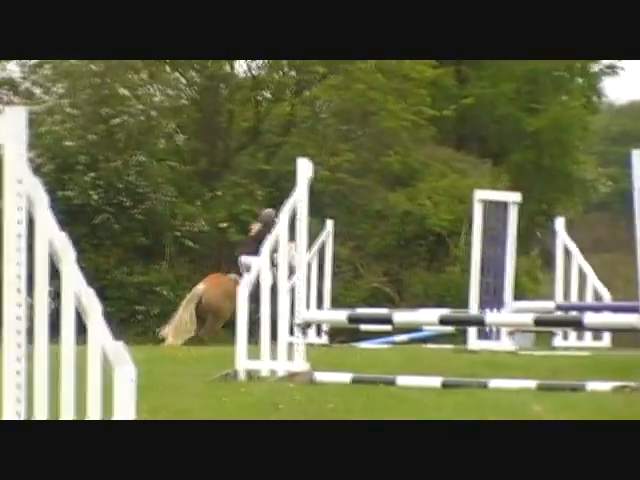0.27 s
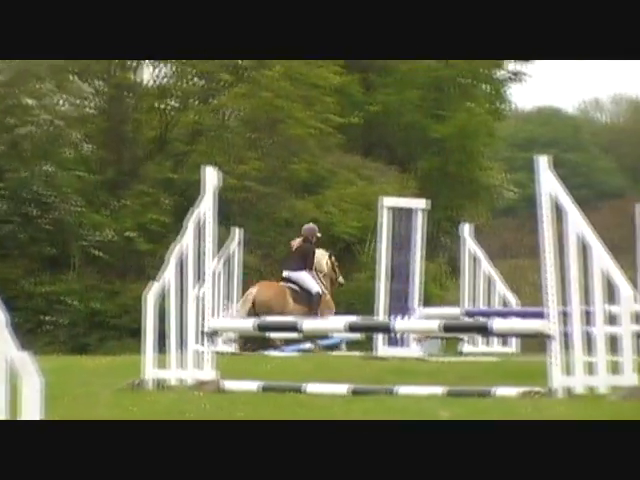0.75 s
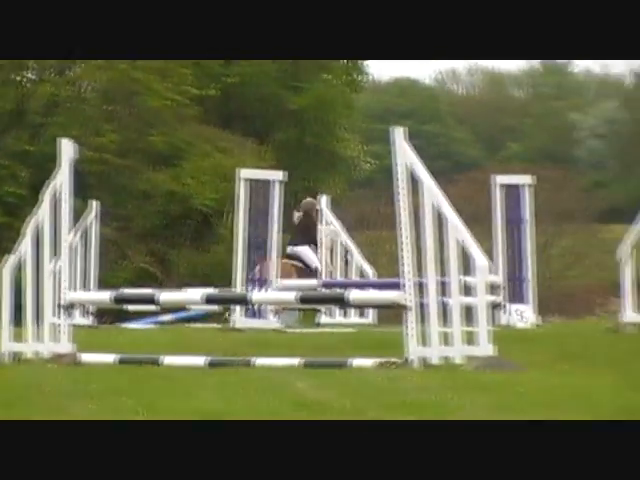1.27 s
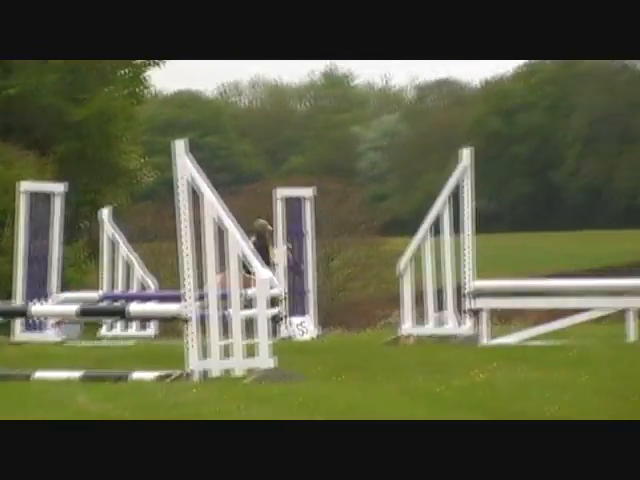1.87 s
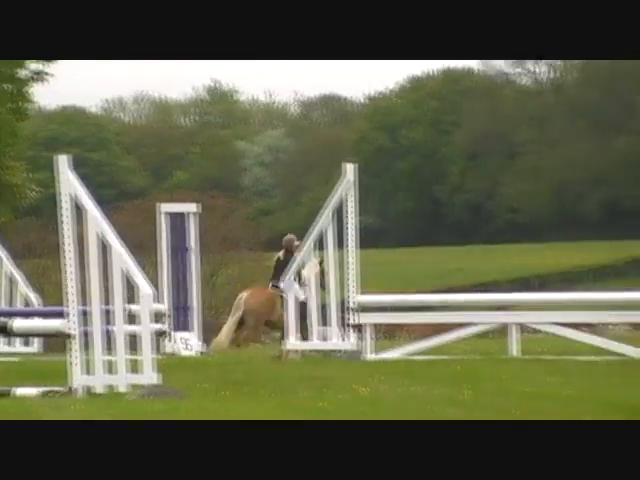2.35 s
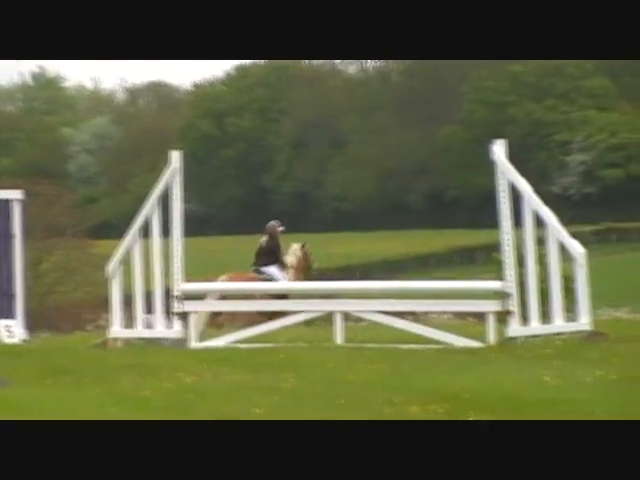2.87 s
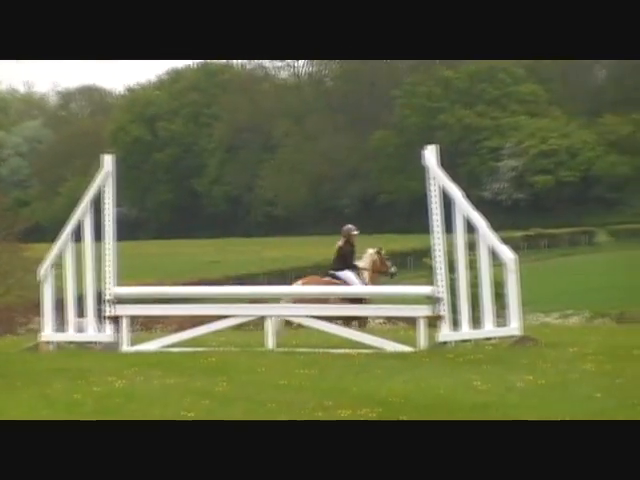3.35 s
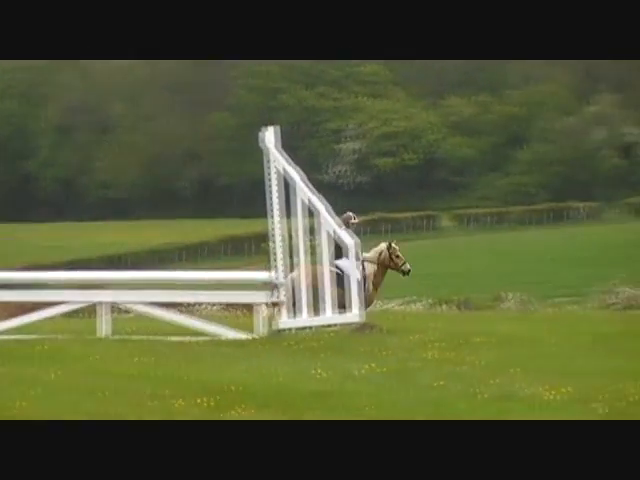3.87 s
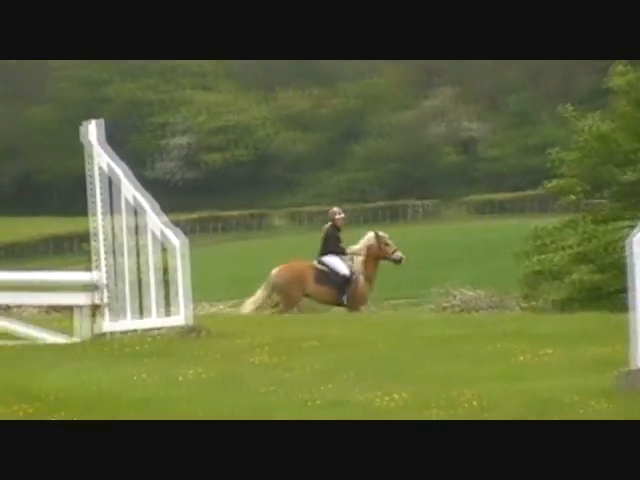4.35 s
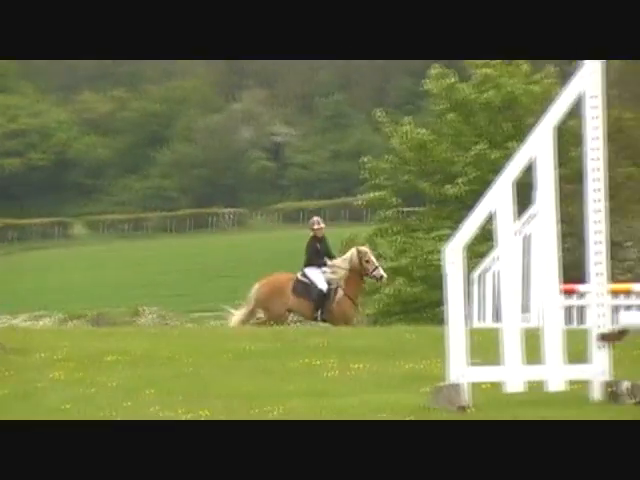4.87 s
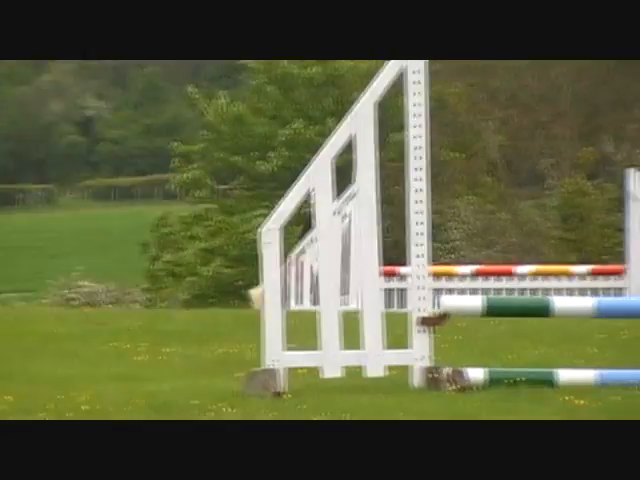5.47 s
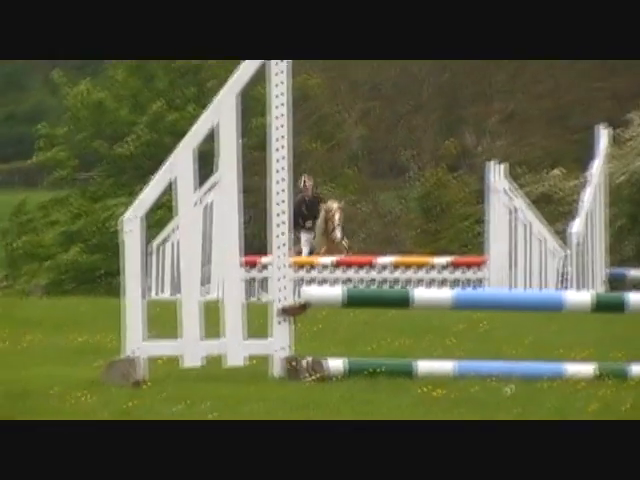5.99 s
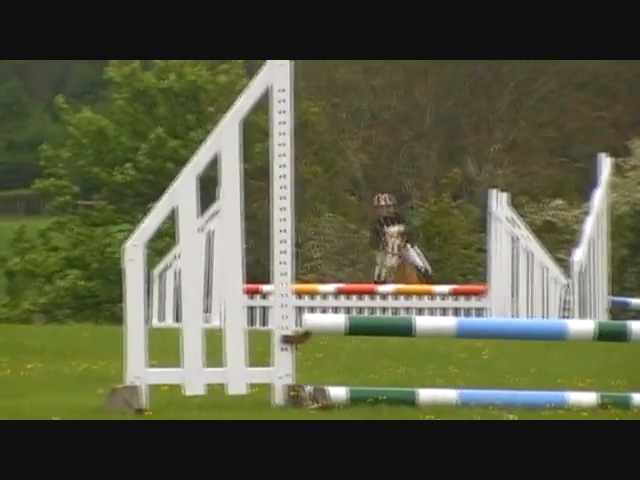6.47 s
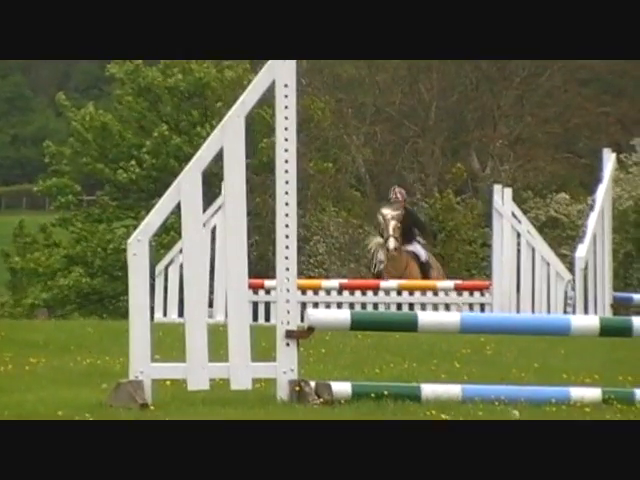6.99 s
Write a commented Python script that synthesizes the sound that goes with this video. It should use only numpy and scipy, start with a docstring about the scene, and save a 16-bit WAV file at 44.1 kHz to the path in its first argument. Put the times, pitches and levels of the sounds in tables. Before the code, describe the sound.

A windy open field, heard through an exposed stereo microphone. Deep, uneven gusts buffet the two sides throughout; from about 0.6 to 2.5 seconds they also rush and roar, with a lull near 3.5-4, then mostly low rumbling with occasional slaps near 5.2 and 5.9. Close by, small metal rings clink from the very start, notably at 0.2, 2.5 and 5.0, with little scrapes and short slides early on. Crisp grass crunches and stalk snaps recur roughly every 0.6 seconds from 0.35, sharp at 3.4 and 4.7, fainter after 6. Thin bird whistles glide at 0.2, 1.3-2.1, 3.0, 5.2 and repeatedly after 6. Faint dull hoof thuds come at 2.2 and 3.4-3.8, then 4.9, strongest at 5.5-5.6, continuing in quick succession from 5.9 to 6.4. A short hollow knock sounds far away at 3.9. Soft leaf wash lies beneath until the end at 7.2.

```python
"""Turbulent wind buffets two microphone ports, largely in opposite phase, over a wash of leaves and distance.
From the start small metal rings jingle like a bit: inharmonic decaying modes, with scrapes and slides.
Soon noise bursts crunch as grass in a slow beat, as of grazing, and gliding sines whistle as small birds.
After two seconds a pony canters far off on the turf: dull thuds from a struck, damped ground.
Near four seconds two short damped sines give a hollow knock across the field."""
import sys
import numpy as np
from scipy import signal
from scipy.fft import rfft, irfft
from scipy.io import wavfile
from scipy.ndimage import uniform_filter1d, minimum_filter1d

SR = 44100
rng = np.random.default_rng(int(sys.argv[2]) if len(sys.argv) > 2 else 0)


def pcm_store(signal):
    """Save signal as 16-bit PCM."""
    levels = np.round(np.clip(np.atleast_2d(signal), -1, 1) * 32767)
    wavfile.write(sys.argv[1], SR, levels.astype(np.int16).T)


N = 318402
T, FREQS = np.arange(N) / SR, np.maximum(np.fft.rfftfreq(N, 1 / SR), 1)

# gusts on the ports: start t/s, end t/s, buffeting level/dB, rush of the breaking flow level/dB,
# sag of the rush/(dB/s)
GUSTS = [(0.043, 0.09, -10.5, -34, 8), (0.1, 0.149, -12.5, -31.5, 20), (0.402, 0.44, -12, -28.5, 0),
         (0.456, 0.53, -10, -25.5, -3), (0.601, 0.65, -11.5, -24.5, 60), (0.711, 0.93, -12, -25, 29),
         (0.977, 1.11, -15, -29, 25), (1.136, 1.242, -9.5, -21, -8), (1.274, 1.42, -10.5, -21, 22),
         (1.46, 1.555, -11.5, -21.5, -45), (1.582, 1.642, -8.5, -22.5, 38), (1.735, 1.765, -12, -16.5, -12),
         (1.806, 1.911, -9.5, -20.5, 16), (1.926, 2.026, -10, -29, -30), (2.052, 2.058, -13, -20, 0),
         (2.241, 2.323, -13, -28, 102), (2.416, 2.505, -10, -23.5, 50), (2.535, 2.895, -8.5, -31, 0),
         (2.943, 2.966, -11.5, -31.5, 20), (3.048, 3.133, -9, -34, 1), (3.203, 3.24, -8.5, -46.5, 0),
         (3.297, 3.284, -8.5, -24.5, 0), (3.449, 3.454, -18.5, -38, 30), (3.707, 3.712, -21.5, -81, 0),
         (4.042, 4.18, -18, -44, -26), (4.202, 4.3, -11.5, -34.5, 23), (4.36, 4.373, -12.5, -54, 0),
         (4.642, 4.706, -10.5, -34, -17), (4.73, 4.766, -7.5, -33, 0), (4.89, 4.91, -10, -40, 0),
         (4.937, 5.006, -9.5, -34, -25), (5.091, 5.405, -9, -32, 5), (5.519, 5.795, -9.5, -31, 23),
         (5.85, 5.98, -9.5, -40.5, -36), (6.026, 6.134, -11, -47.5, 3), (6.163, 6.414, -11, -42.5, -4),
         (6.554, 6.72, -6, -51, 0), (6.779, 6.997, -8, -32.5, 59), (7.073, 7.223, -8.5, -40.5, -13)]
GUST_ATTACK_S, GUST_RELEASE_S = 0.039, 0.041
BUFFET_SAG_DB_PER_S = 6
# light breeze between gusts: t/s, buffeting level/dB
BREEZE = [(0, -11.5), (0.33, -23), (0.65, -25), (1.7, -15), (2.15, -19.5), (2.35, -22), (2.52, -16),
          (3.1, -14), (3.45, -22), (3.6, -28), (3.95, -27.5), (4.1, -15.5), (4.5, -18), (5.8, -13.5),
          (6.5, -14), (7.22, -16)]
BREEZE_RUSH_DB, RUSH_PER_BUFFET = -10, 2.51   # rush at 0 dB of buffeting; dB of rush per dB of buffeting
# spectrum of the eddies before gusts act: f/Hz, relative level/(dB per Hz)
WIND_COLOUR = [(20, -61), (40, -34.5), (85, -25.5), (150, -24.5), (210, -25.5), (300, -24.5), (500, -30.5),
               (1000, -37.5), (1400, -42), (2000, -50.5), (2600, -56.5), (3300, -68.5), (4500, -79.5)]
# how far each pitch follows the rush rather than the buffeting: f/Hz, weight/1
RUSH_SHARE = [(170, 0.021), (300, 0.41), (500, 0.52), (1000, 0.74), (2500, 1.63)]
# part of the wind that both ports share: f/Hz, middle relative to side level/dB
WIND_COMMON = [(30, -13), (85, -15.5), (170, -13), (300, -11), (700, -12), (2000, -5.5)]

FIELD_DB = -68.5   # gain of distant trees and field outside the dips
# brief dips of the background: middle t/s, depth level/dB, half length t/s
DIPS = [(1.65, 2, 0.37), (2.1, 6, 0.091), (2.72, 5, 0.061), (5.286, 3, 0.041), (5.85, 3, 0.54),
        (6.17, 11.5, 0.2), (6.926, 7, 0.16)]
# colour of the field before its gain: f/Hz, relative level/(dB per Hz)
FIELD = [(60, 1.5), (300, -16.5), (600, -12.5), (1000, -12), (1250, -16.5), (1600, -18), (2400, -25.5),
         (3500, -31), (5000, -34), (8500, -38), (11000, -48.5), (15000, -55)]
# width of the field: f/Hz, side to middle level/dB
FIELD_SIDE = [(100, 14), (600, -8), (2500, -4.5), (5000, -4.5), (8000, 0), (12000, 3)]

# crunches of grass in a slow beat: middle t/s, relative level/dB, half length t/s
CRUNCHES = [(0.367, -57, 0.033), (1.012, -58, 0.033), (1.619, -55.5, 0.029), (2.249, -59, 0.045),
            (2.833, -58, 0.029), (3.427, -52, 0.023), (4.06, -60.5, 0.029), (4.68, -52.5, 0.031),
            (5.498, -56.5, 0.018), (6.108, -70, 0.038), (6.698, -64, 0.039)]
# thick stalks snapping: t/s, relative level/dB, centre f/Hz
SNAPS = [(0.3475, -34, 6000), (0.3634, -34, 6000), (0.3697, -32, 5000), (0.3757, -37, 6000),
         (0.424, -34.5, 7000), (0.456, -34, 7000), (0.487, -36.5, 10000), (0.9587, -30.5, 7000),
         (0.972, -34, 8000), (0.989, -32, 7000), (1.105, -38, 5500), (1.1097, -29.5, 5500),
         (1.172, -40, 8000), (1.29, -41, 10000), (1.5997, -33, 3500), (1.603, -40, 4000), (1.62, -44, 3000),
         (1.657, -41, 7000), (1.68, -34, 9000), (1.702, -38, 6000), (2.198, -30.5, 2960),
         (2.214, -31, 3500), (2.235, -34, 7000), (2.2824, -28, 3900), (2.296, -33, 4500),
         (2.334, -34.5, 9000), (2.824, -34, 3500), (2.9034, -40, 9000), (3.2374, -30, 1500),
         (3.2424, -26, 11000), (3.266, -29, 2100), (3.388, -33, 5000), (3.4234, -22.5, 4000),
         (3.431, -29, 5000), (3.437, -35, 6000), (3.477, -31, 6040), (3.494, -29.5, 9000),
         (3.506, -32, 9000), (4.025, -37, 3800), (4.08, -34, 6000), (4.607, -37, 6000),
         (4.6538, -24.5, 6030), (4.6835, -39, 5000), (4.6946, -41, 6000), (4.735, -29.5, 3480),
         (5.108, -38, 7000), (5.186, -36, 7000), (5.455, -26.5, 6100), (5.4891, -30, 5000),
         (5.521, -36, 7000), (5.5554, -38, 9000), (5.985, -42, 4200), (6.112, -42, 8500),
         (6.7134, -38, 4000), (6.8403, -41.5, 3500)]
# colour of the tearing grass: f/Hz, relative level/(dB per Hz)
GRASS = [(400, 15.5), (1200, 11.5), (2500, 8), (4700, 2.5), (6500, -0.5), (9000, -1.5), (12000, -14.5),
         (14000, -23), (15500, -38)]
# width of the grass: f/Hz, side to middle level/dB
GRASS_SIDE = [(400, -11), (3000, -13.5), (5500, -9), (8000, -2.5), (10000, 6.5), (15000, 7)]
FIBRE_S, SNAP_S = 0.0002, 0.0004   # decay times of a fibre's crack and a stalk's snap

# clinks of the rings: t/s, relative level/dB, upper partials relative level/dB,
# larger ring relative level/dB, base ring time t/s, scrape relative level/dB
JINGLES = [(0.0024, -31.5, -11, -28, 0.077, -45), (0.174, -50, -3, -4, 0.13, -45),
           (0.208, -28, -11, -24, .06, -47), (0.22, -41.5, -10, -11, 0.12, -44),
           (0.2833, -44.5, -6, -14, 0.069, -49), (0.676, -37.5, -21, -18, 0.048, -50),
           (0.798, -39.5, -12, -5, 0.11, -52), (0.834, -42, -22, -7, 0.055, -56),
           (1.337, -39, -21, -20, 0.054, -55), (1.444, -47, 0.5, -22, 0.051, -60),
           (1.701, -56, 2, -12, 0.039, -55), (1.895, -47, -9, -14, 0.058, -56),
           (1.915, -41, -16, -19.5, 0.038, -53), (2.025, -45.5, -9, -12, 0.1, -49),
           (2.3335, -61, 6, -6, 0.34, -48), (2.368, -36.5, -11, -22, 0.048, -49),
           (2.489, -31, -15, 2.5, 0.11, -37), (2.641, -42, -10.5, -11, 0.09, -54),
           (3.062, -42, -5, -25, 0.037, -43), (3.1374, -46.5, -2.5, -12, 0.073, -46),
           (3.243, -49, -11, -13, 0.056, -46), (3.272, -45, -2, -12, 0.055, -53),
           (3.304, -51, -1, -11.5, 0.057, -47), (3.7214, -42, -6.5, -7, 0.084, -52),
           (4.271, -50.5, -16, 11, .12, -51), (4.44, -36, -5.5, -29.5, 0.024, -57),
           (4.692, -44, -10, -10, .06, -55), (4.7606, -46, -12, -20, 0.041, -55),
           (4.9712, -33, -11.5, -29, 0.031, -45), (5.056, -51, -16, -14, .04, -55),
           (5.157, -42, -6, -23, 0.029, -52), (5.361, -38, -9, -25, 0.051, -53),
           (5.568, -49, -10, -13, 0.043, -58), (5.8215, -45, -7, -18, 0.035, -53),
           (5.928, -45, -11, -19, 0.06, -62), (6.1245, -51, -8, -14, .06, -55),
           (6.349, -49, -10, -14, 0.049, -58), (6.434, -55, -3, -12, 0.066, -59),
           (6.5, -52, -14, -10, 0.13, -67), (6.5242, -41.5, -2.5, -18, 0.077, -49),
           (6.574, -55, -12, -8, 0.056, -60), (6.6317, -48, 8, -16, 0.066, -52),
           (6.894, -59.5, -4, -5, .12, -71), (7.1172, -45, -5, -10, 0.052, -54)]
# modes of the smaller ring: f/Hz, relative level/dB, share of the ring time/1, phase lead at left/rad
SMALL_RING = [(5740, -2, 0.47, .7), (5705, 0.5, 0.69, .7), (11020, 5, 1.2, 2.4), (11500, -6, 0.83, 1.4),
              (15684, -15, 1.1, 2.3)]
# modes of the larger ring: f/Hz, relative level/dB, share of the ring time/1, phase lead at left/rad
LARGE_RING = [(5467, -2, 2, 0.64), (11080, 11.5, 0.8, 2.3), (11360, 3, 0.75, 1.9), (15110, -6, 1.3, 2.6)]
GRIP_T60_S = 0.012   # ring time of a mode under an ordinary contact

# single eddies that slap the ports: t/s, relative level/dB, crack relative to the swing level/dB
SLAPS = [(0.127, -8, -26), (0.595, -7, -18), (1.735, -6, -19), (1.758, -4, -14), (1.959, -7, -22),
         (2.02, -6, -26), (2.665, -3, -13), (5.167, -9, -22), (5.866, -4, -9), (5.966, -7, -27),
         (5.99, -6, -11)]
# rings sliding over each other: middle t/s, level/dB, half length t/s, pitch f/Hz
SLIDES = [(0.163, -59.5, 0.033, 5480), (0.654, -55, 0.013, 5750), (0.824, -53, .007, 5460),
          (1.028, -54, .005, 5700), (1.218, -60, 0.012, 5500), (1.329, -61, 0.0073, 5650)]
# bird whistles: t/s, length t/s, starting f/Hz, final f/Hz, glide t/s, relative level/dB
BIRDS = [(0.202, 0.063, 3680, 3150, .04, -67), (1.3, 0.355, 2890, 4330, 0.028, -67),
         (1.87, 0.27, 4040, 3890, .15, -71), (2.03, 0.12, 4220, 4100, 0.14, -77),
         (3.045, 0.061, 3930, 3770, 0.015, -66.5), (5.982, 0.027, 4620, 4200, 0.0069, -64),
         (5.163, 0.08, 3290, 2650, 0.038, -67), (6.155, 0.066, 4250, 6200, 0.092, -80),
         (6.224, 0.021, 4300, 3980, .01, -71), (6.331, 0.022, 3880, 4300, 0.011, -66),
         (6.455, 0.022, 3080, 3400, .01, -67), (6.85, 0.1, 4100, 3330, 0.048, -76),
         (6.97, 0.024, 4940, 4050, 0.014, -68), (7.12, 0.075, 3830, 3400, 0.036, -71)]
# hooves on turf: t/s, relative thud level/dB, peak scuff level/dB
HOOVES = [(2.175, -26, -32.5), (3.352, -28.5, -51), (3.43, -35, -47), (3.779, -29.5, -31.5),
          (4.89, -16.5, -40), (5.51, -8, -44), (5.587, -12.5, -28), (5.925, -12.5, -30),
          (6.05, -16.5, -36.5), (6.123, -16, -48), (6.198, -18, -40), (6.279, -22, -48),
          (6.386, -18.5, -35)]
# modes of the turf: f/Hz, relative level/dB, 60 dB decay t/s
TURF = [(133, -10, 0.036), (204, 30.5, 0.05), (290, 7, 0.11), (435, -23, 0.028), (700, -31, .025)]
# far hollow knock: t/s, f/Hz, relative level/dB, 60 dB decay t/s
KNOCK = [(3.942, 1540, -33, .028), (3.941, 1740, -38, .016)]
CUTOFF_HZ = 15900


def from_db(db):
    """The definition of the decibel turns a level into an amplitude gain."""
    return np.exp(np.asarray(db) * np.log(10) / 20)


def rms_one(x):
    """Normalisation by mean power gives rms 1."""
    return x / np.sqrt(np.mean(x ** 2) + 1e-20)


def at_hz(points, hz):
    """Linear interpolation on a log-frequency axis reads a spectrum."""
    f, value = np.transpose(points)
    return np.interp(np.log(hz), np.log(f), value)


def colour(x, spectrum):
    """Multiplication in the frequency domain filters by a smooth spectrum."""
    return irfft(rfft(x) * from_db(at_hz(spectrum, FREQS)), N)


def drift(rate_hz):
    """Low-passed noise wanders at random with spread 1."""
    spectrum = rfft(rng.standard_normal(N)) / (1 + (FREQS / rate_hz) ** 2)
    return rms_one(irfft(spectrum, N))


def hiss():
    """Two independent white noises have a flat density of 0 dB per Hz."""
    return rng.standard_normal((2, N)) * np.sqrt(SR / 2)


def stereo(mid, side):
    """Sum and difference of middle and side give left and right."""
    return np.array([mid + side, mid - side])


def add(out, s, sound):
    """Superposition mixes a sound in at time s."""
    i = max(round(s * SR), 0)
    out[..., i:i + sound.shape[-1]] += sound[..., :out.shape[-1] - i]


def band(x, low_hz, high_hz, order=1):
    """A Butterworth band-pass attenuates gently outside its band."""
    edges = [low_hz, min(high_hz, SR / 2 - 1000)]
    return signal.sosfilt(signal.butter(order, edges, "band", fs=SR, output="sos"), x)


def gusts():
    """Gust envelopes in dB: each gust springs up out of the breeze, sags as it blows and drops away."""
    breeze_db = np.interp(T, *np.transpose(BREEZE))
    buffet = from_db(breeze_db)
    rush = from_db(BREEZE_RUSH_DB + RUSH_PER_BUFFET * breeze_db)
    for start, end, buffet_db, rush_db, sag in GUSTS:
        age = np.clip(T - start, 0, end - start)
        attack = (np.maximum(start - T, 0) / GUST_ATTACK_S) ** 2
        release = np.maximum(T - end, 0) / GUST_RELEASE_S
        shape = np.exp(-np.minimum(attack + release, 20))
        buffet = np.maximum(buffet, shape * from_db(buffet_db - BUFFET_SAG_DB_PER_S * age))
        rush = np.maximum(rush, shape ** 2 * from_db(rush_db - sag * age))
    return 20 * np.log10([buffet, rush])


def wind(lump_db=1.34, flutter_db=3.0, lump_hz=16, flutter_hz=45, left_db=2.5):
    """Turbulence: eddies push the ports against each other; a harder breaking flow reaches higher."""
    buffet_db, rush_db = gusts()
    lumps, flutter = drift(lump_hz), drift(flutter_hz)
    eddies = rfft(hiss()) * from_db(at_hz(WIND_COLOUR, FREQS))
    eddies[0] *= from_db(at_hz(WIND_COMMON, FREQS))
    out = np.zeros((2, N))
    for hz in 20 * 2. ** np.arange(9):   # overlapping octaves
        octave = np.maximum(1 - np.abs(np.log2(FREQS / hz)), 0)
        share = at_hz(RUSH_SHARE, hz)
        level_db = (1 - share) * buffet_db + share * rush_db
        level_db = level_db + lump_db * lumps + share * flutter_db * flutter
        balance_db = share * left_db * (hz < 1000) * np.array([[1], [-1]])
        out += stereo(*irfft(eddies * octave, N)) * from_db(level_db) * from_db(balance_db)
    return out


def background_db():
    """Gaussian dips in level lower the otherwise steady gain of the field."""
    return FIELD_DB - sum(depth * np.exp(-.5 * ((T - s) / half) ** 2) for s, depth, half in DIPS)


def field():
    """Diffuse sound: coloured noise makes a soft wash of leaves and distance."""
    mid, side = colour(hiss(), FIELD)
    return stereo(mid, colour(side, FIELD_SIDE)) * from_db(background_db())


def grass(fibres_per_s=1100, size_db=3.0, clump_db=2.5, clump_hz=110, crunch_db=5, snap_db=0,
          splinter_db=-12, splinter_s=0.0025, snap_width=1.53, rub_db=-5, stir_db=1):
    """Fracture: fibres rub and crack at random under swelling pulls; thick stalks snap and splinter."""
    pull = sum(from_db(db + crunch_db) * np.exp(-.5 * ((T - s) / half) ** 2) for s, db, half in CRUNCHES)
    pull = pull + from_db(background_db() + stir_db)   # a little stirring in between
    is_break = rng.random(N) < fibres_per_s / SR
    break_db = size_db * np.minimum(rng.exponential(1, N), 3) + clump_db * drift(clump_hz)
    breaks = is_break * from_db(break_db)
    cracks = rms_one(signal.lfilter([1], [1, -np.exp(-1 / (FIBRE_S * SR))], breaks))
    roughness = rms_one(np.hypot(cracks, from_db(rub_db)))
    tearing = pull * roughness * rng.standard_normal((2, N))
    t = np.arange(SR // 50) / SR
    snap = np.exp(-t / SNAP_S) + from_db(splinter_db) * np.exp(-t / splinter_s)
    for s, db, hz in SNAPS:
        burst = from_db(db + snap_db) * snap * rng.standard_normal((2, len(t)))
        add(tearing, s, band(burst, hz / snap_width, hz * snap_width))
    mid, side = colour(tearing, GRASS)
    return stereo(mid, colour(side, GRASS_SIDE)) * from_db([[1.2], [-1.2]])   # slightly to the left


def clink(db, upper_db, large_db, t60, bounce=0.12, bounce_db=-6, scatter_db=3, contact_s=0.000097,
          tick_db=-19, tick_s=0.0005, tick_hz=10000, rattle_db=2, settle=0.6, rough=0.11, rough_hz=350,
          stiffen_hz=25, blur_hz=45):
    """Modal impact: two rings knock, bounce twice and ring; each port hears a mode at its own phase."""
    t = np.arange(SR // 8) / SR
    out = np.zeros((2, len(t)))
    lags = np.cumsum(bounce * t60 * rng.uniform(.3, 1.7, 2))   # tightly held rings bounce sooner
    for lag, touch_db in [(0, 0), (lags[0], bounce_db), (lags[1], 2 * bounce_db)]:
        tick = band(rng.standard_normal((2, len(t))), tick_hz / 4, tick_hz, order=2)
        sound = from_db(tick_db) * tick * np.exp(-t / tick_s)
        for modes, ring_db in ((SMALL_RING, 0), (LARGE_RING, large_db)):
            for hz, mode_db, share, lead in modes:
                level_db = ring_db + mode_db + upper_db * (hz > 8000) + rng.normal(0, scatter_db)
                mode_t60 = t60 * share
                # a contact that damps a mode also shifts its pitch, on average upward, and makes it wander
                grip = min(GRIP_T60_S / mode_t60, 3)
                pitch = hz + stiffen_hz * grip * (.5 + rng.normal())
                wander = np.cumsum(rng.standard_normal(len(t))) * grip * np.sqrt(2 * np.pi * blur_hz / SR)
                port_phase = lead * np.array([[.5], [-.5]])
                phase = (2 * np.pi * pitch * t + wander + port_phase).astype(np.float32)
                sound += from_db(level_db) * np.exp(-np.log(1000) * t / mode_t60) * np.sin(phase)
        add(out, lag, from_db(db + touch_db) * sound * (1 - np.exp(-t / contact_s)))
    rubbing = band(rng.standard_normal(len(t)), rough_hz / 10, rough_hz)
    out *= 1 + rough * rms_one(rubbing)   # they rub as they ring
    # tiny touches while they ring
    chatter = (rng.random(len(t)) < 600 / SR) * rng.standard_normal((2, len(t)))
    out += from_db(db + rattle_db - 40 * t / t60) * band(chatter, 4500, 11000, order=3)
    return out / (1 + (t / (settle * t60)) ** 6)   # the rings come to rest against each other and go dead


def scrape(db, slide_s=0.0066, grit_per_s=2500, low_hz=5000, high_hz=11000, side_db=2):
    """Sliding friction: metal on metal gives a dying spray of tiny random ticks as the rings meet."""
    t = np.arange(SR // 8) / SR
    ticks = rng.random(len(t)) < grit_per_s / SR
    grit = ticks * np.sqrt(SR / grit_per_s) * np.exp(-t / slide_s)
    mid, side = band(grit * rng.standard_normal((2, len(t))), low_hz, high_hz, order=2)
    return from_db(db) * stereo(mid, from_db(side_db) * side)


def jingles(level_db=-4, high_db=1, large_ring_db=1, left_db=1.0, faint_db=-1, faint_range_db=8,
            faint_upper_db=-8, faint_t60=0.08, count=12):
    """Modal ringing after impact: clear clinks, with faint stirrings of the rings at random times."""
    out = np.zeros((2, N))
    for s, db, upper_db, large_db, t60, scrape_db in JINGLES:
        ringing = clink(db + level_db, upper_db + high_db, large_db + large_ring_db, t60)
        add(out, s, ringing + scrape(scrape_db))
    floor_db = background_db()
    for s, size in rng.random((count, 2)) * [T[-1], 1]:
        db = floor_db[int(s * SR)] + faint_db + faint_range_db * size
        add(out, s, clink(db, faint_upper_db, 0.0, faint_t60))
    return out * from_db([[left_db], [-left_db]])


def slaps(width_s=0.0013, crack_s=0.0018, crack_hz=950, common=0.28):
    """Pressure pulses: an eddy swings the ports largely in opposition, with a brief dull crack at each."""
    out, t = np.zeros((2, N)), np.arange(-SR // 100, SR // 100) / SR
    swing = 2 * t / width_s * np.exp(-(t / width_s) ** 2)
    dull = signal.butter(2, crack_hz, fs=SR, output="sos")
    for s, db, crack_db in SLAPS:
        burst = rng.standard_normal((2, len(t))) * np.exp(-(t / crack_s) ** 2)
        crack = signal.sosfilt(dull, burst)
        add(out, s + t[0], from_db(db) * (stereo(common * swing, swing) + from_db(crack_db) * crack))
    return out


def slides(width=0.016, left_db=1.0):
    """Frictional excitation keeps the lowest mode of a ring sounding, rough and without a knock."""
    out, t = np.zeros(N), np.arange(-SR // 10, SR // 10) / SR
    for s, db, half, hz in SLIDES:
        singing = rms_one(band(rng.standard_normal(len(t)), hz / (1 + width), hz * (1 + width)))
        add(out, s + t[0], from_db(db) * singing * np.exp(-.5 * (t / half) ** 2))
    return out * from_db([[left_db], [-left_db]])


def birds(waver=0.002, waver_hz=60, trill=0.025, level_db=4.5, fade_s=0.011, gusty_db=3.0, chirp_db=4,
          gusty_hz=60, trees_db=-5, trees_t60=0.2):
    """Frequency modulation: unsteady whistles slide to a held pitch; echoes from the trees blur them."""
    out = np.zeros(N)
    unsteady, flicker = drift(waver_hz), np.minimum(drift(gusty_hz), 1)
    for s, length, start_hz, end_hz, glide, db in BIRDS:
        t = np.arange(int(length * SR)) / SR
        slide = np.exp(-t / glide)
        wobble = waver + trill * slide * abs(start_hz - end_hz) / 1000
        hz = (end_hz + (start_hz - end_hz) * slide) * (1 + wobble * np.interp(s + t, T, unsteady))
        fade = np.minimum(np.minimum(t, length - t) / fade_s, 1)
        swell = fade * from_db((gusty_db + chirp_db * slide) * np.interp(s + t, T, flicker))
        add(out, s, from_db(db + level_db) * swell * np.sin(2 * np.pi * np.cumsum(hz) / SR))
    echoes = rng.standard_normal((2, SR // 4)) * from_db(-60 * T[:SR // 4] / trees_t60)
    echoes *= from_db(trees_db) / np.linalg.norm(echoes[0])
    return out + signal.fftconvolve(out[None], echoes, axes=1)[:, :N]


def hooves(level_db=-2, press_s=0.0051, scatter_db=-20, low_cut_hz=120, soft_hz=1800, scuff_s=0.004,
           scuff_low_hz=260, scuff_high_hz=1000):
    """Damped resonance: each hoof knocks, presses into the turf and sets its dull, short modes going."""
    out, t = np.zeros(N), np.arange(SR // 8) / SR
    turf = sum(from_db(g - 60 * t / t60) * np.sin(2 * np.pi * hz * t) for hz, g, t60 in TURF)
    turf = signal.sosfilt(signal.butter(2, low_cut_hz, "high", fs=SR, output="sos"), turf)
    # the soft ground gives no click
    turf = signal.sosfilt(signal.butter(2, soft_hz, fs=SR, output="sos"), turf)
    for s, db, scuff_db in HOOVES:
        push = rng.standard_normal(len(t)) * np.exp(-t / press_s) * from_db(scatter_db)
        push[0] += 1
        thud = signal.fftconvolve(push, turf)[:len(t)]
        scuff = rng.standard_normal(len(t)) * np.exp(-t / scuff_s)
        for _ in range(2):   # turf soaks up the treble
            scuff = band(scuff, scuff_low_hz, scuff_high_hz, order=2)
        thud = from_db(db + level_db) * thud / np.abs(thud).max()
        scuff = from_db(scuff_db) * scuff / np.abs(scuff).max()
        add(out, s, thud + scuff)
    return stereo(out, 0)


def knock():
    """Exponential decay: two damped modes make one short, hollow tap from across the field."""
    out, t = np.zeros(N), np.arange(SR // 10) / SR
    for s, hz, db, t60 in KNOCK:
        envelope = from_db(db - 60 * t / t60) * (1 - np.exp(-t / 0.00054))
        add(out, s, envelope * np.sin(2 * np.pi * hz * t))
    return stereo(out, 0)


def scene():
    """Linear superposition sums every source at the two ports."""
    return wind() + field() + grass() + jingles() + slaps() + slides() + birds() + hooves() + knock()


def record(dry):
    """Gain reduction: a fast limiter holds peaks at full scale, then a steep low-pass cuts the top."""
    gain = minimum_filter1d(1 / np.maximum(np.abs(dry).max(axis=0), 1), size=SR // 200)
    limited = dry * uniform_filter1d(gain, size=SR // 200)
    return signal.sosfilt(signal.ellip(10, .1, 90, CUTOFF_HZ, fs=SR, output="sos"), limited)


dry = scene()
out = record(dry)
pcm_store(out)
```